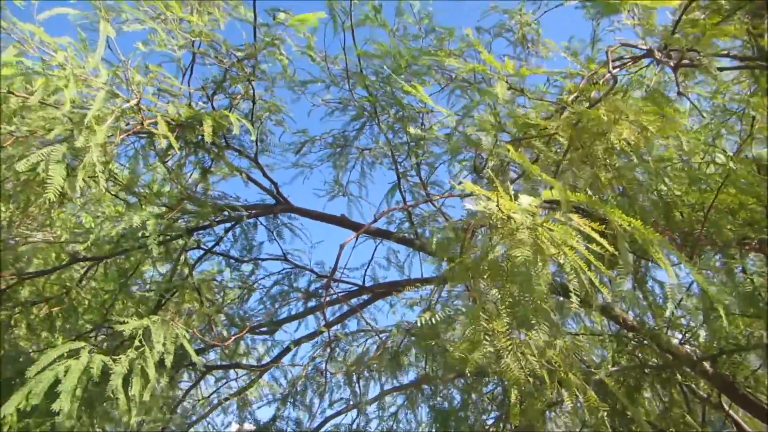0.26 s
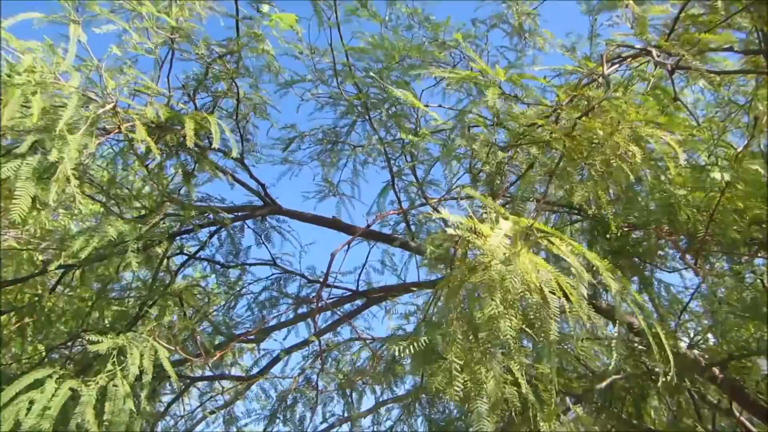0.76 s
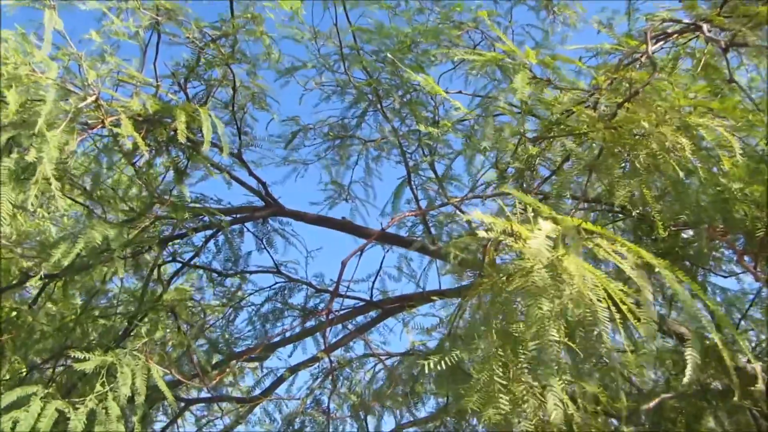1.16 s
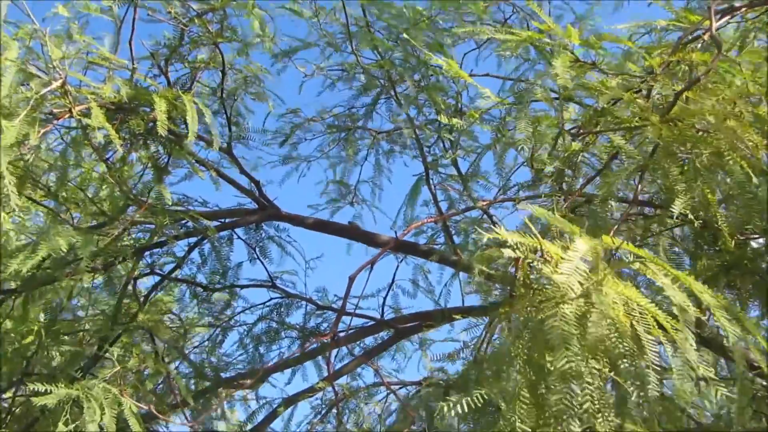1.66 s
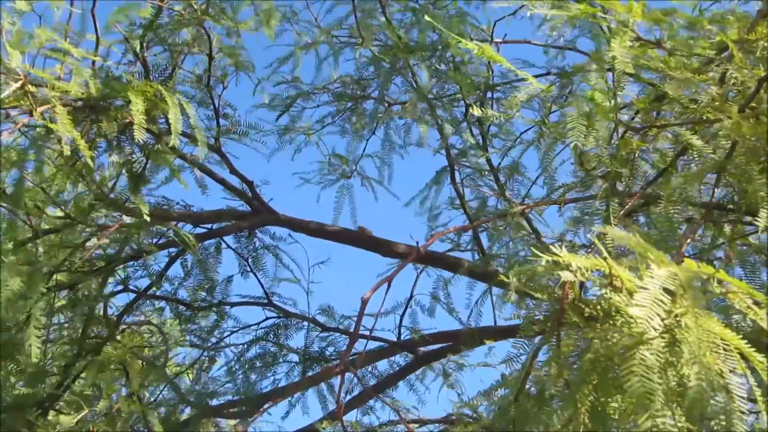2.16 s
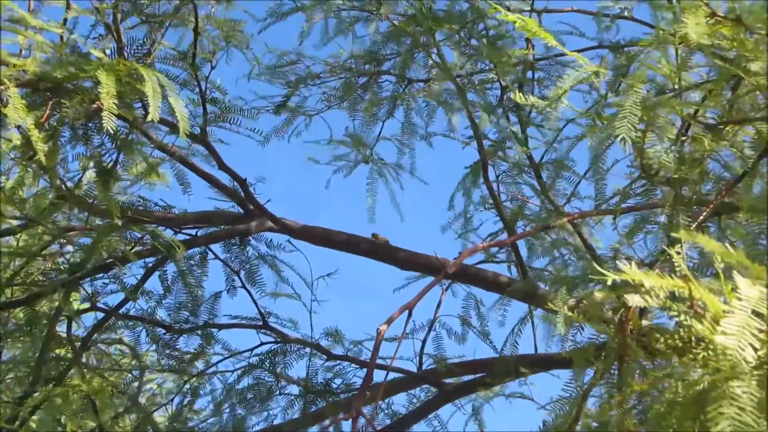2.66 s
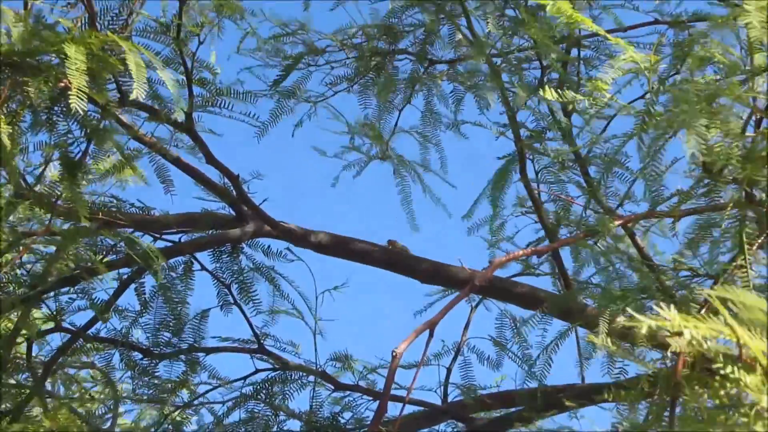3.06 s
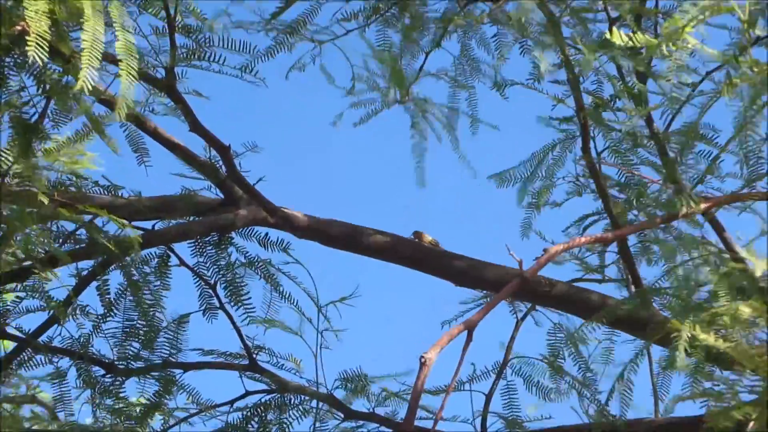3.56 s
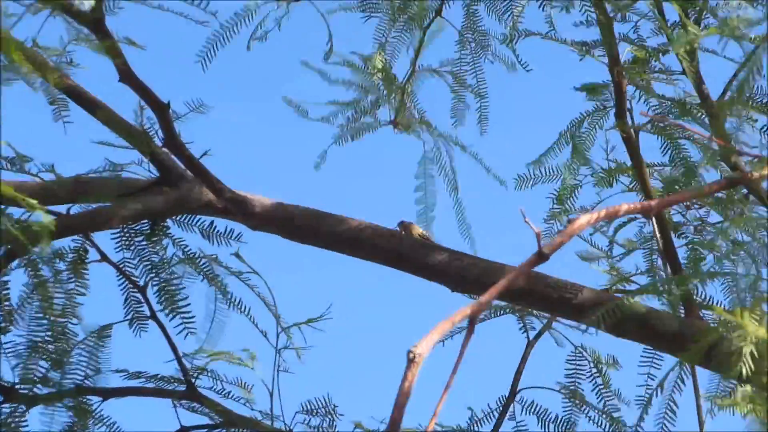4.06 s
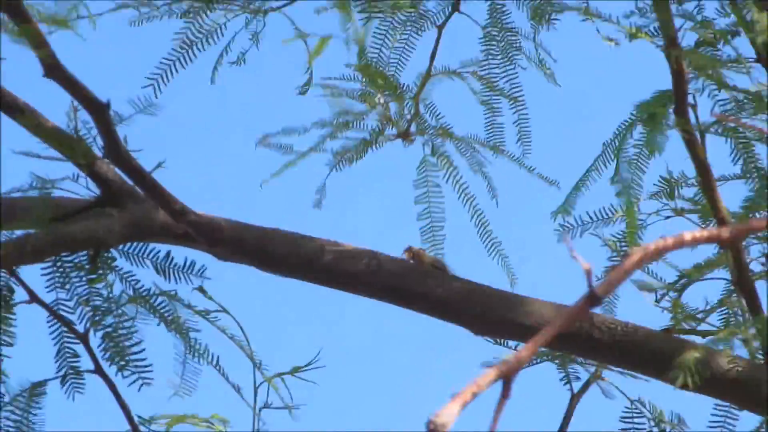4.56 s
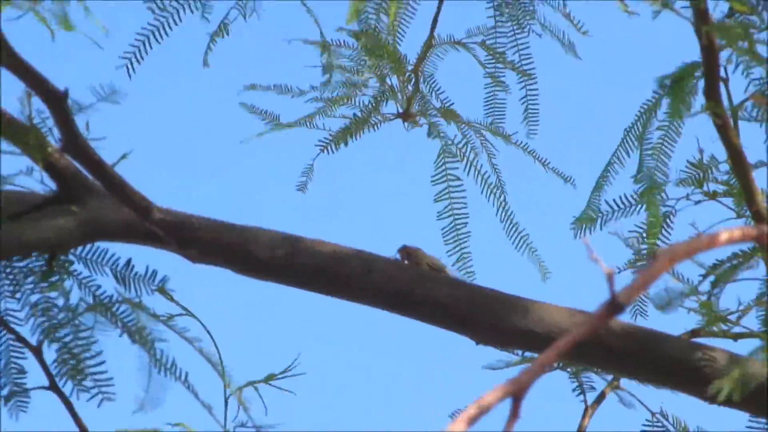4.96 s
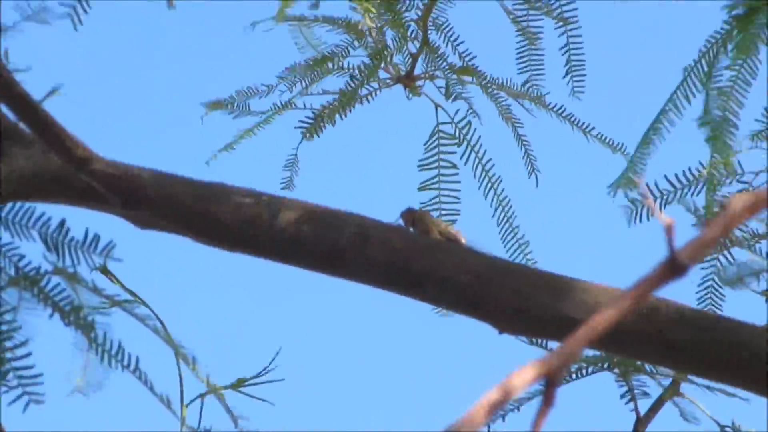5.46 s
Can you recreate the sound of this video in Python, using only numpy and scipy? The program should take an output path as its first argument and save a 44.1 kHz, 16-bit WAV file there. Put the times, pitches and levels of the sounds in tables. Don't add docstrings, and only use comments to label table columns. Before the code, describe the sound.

A cicada in a leafy tree holds a piercing, rattling high buzz over faint chorus, with zoom-lever clicks and soft wind thumps on the microphone.

```python
import sys
import numpy as np
from scipy import signal
from scipy.fft import rfft, irfft, next_fast_len
from scipy.io import wavfile
from scipy.ndimage import uniform_filter1d, minimum_filter1d, map_coordinates

SR = 44100
rng = np.random.default_rng(int(sys.argv[2]) if len(sys.argv) > 2 else 0)


def convert_level_to_amplitude(level_db):
    exponent = np.asarray(level_db, float) / 20
    return 10 ** exponent


def materialize(psi):
    bounded = np.clip(np.atleast_2d(psi).T, -1, 1)
    quanta = np.round(bounded * 32767).astype(np.int16)
    wavfile.write(sys.argv[1], SR, quanta)


N = 251370
TIME = np.arange(N) / SR


def unit(x):
    return x / np.sqrt(np.mean(x ** 2) + 1e-20)


def gain(points, hz):
    f, db = np.transpose(points)
    return convert_level_to_amplitude(np.interp(np.log(hz + 1), np.log(f + 1), db))


def wobble(rate_hz):
    return map_coordinates(rng.standard_normal(int(N * rate_hz / SR) + 4), [TIME * rate_hz])


def filtered(x, response):
    m = next_fast_len(N + 8192)
    return irfft(rfft(x, m) * response(np.fft.rfftfreq(m, 1 / SR)), m)[..., :N]


def resonance(f, hz, width_hz):
    return 1j * f * width_hz / (hz * hz - f * f + 1j * f * width_hz)


def passband(f, low_hz, high_hz, edge_hz):
    return np.clip(np.minimum(f - low_hz, high_hz - f) / edge_hz + .5, 0, 1)


def pulses(times_s, sizes):
    at = times_s.ravel()[:, None] * SR
    taps = np.floor(at) + np.arange(-15, 17)
    window = np.cos(np.pi * (taps - at) / 32) ** 2
    kernel = np.sinc(taps - at) * window * sizes.ravel()[:, None]
    return np.bincount(np.clip(taps, 0, N).astype(int).ravel(), kernel.ravel(), N + 1)[:N]


# delay_ms, sign, level_db, time_scatter_ms, size_scatter_db
RIBS = [(0, 1, 0, 0, .4), (.45, 1, -15, .004, 1.2), (.845, -1, -7.5, .006, 1), (1.035, -1, -20, .006, 1.5),
        (1.215, -1, -16, .008, 1.5), (1.42, 1, -14, .05, 1.2), (1.72, 1, -13.5, .06, 1.2),
        (2.8, 1, -19, .15, 2.5)]
RIB_PACE, RIB_SCATTER = .994, 0.45
# pitch_hz, level_db
SHORT_RIBS = [(6000, -7), (9000, -3), (11000, 2.5), (13000, -0.5), (15500, -17)]
# lead_ms, level_db
PAIR = (.2015, -3)
# pitch_hz, width_hz, level_db
AIR_SAC = (6470, 470, -13)


def singer(rate_hz, beat, colour, jitter_ms):
    even_s = np.arange(int(N / SR * rate_hz) + 1) / rate_hz
    lag_ms = np.interp(even_s, *np.transpose(beat)) + jitter_ms * rng.standard_normal(len(even_s))
    stroke_s = even_s + lag_ms / 1000
    delay_ms, sign, level_db, slip_ms, scatter_db = np.transpose(RIBS)
    time_chance, size_chance = rng.standard_normal((2, len(even_s), len(RIBS)))
    times_s = stroke_s[:, None] + (RIB_PACE * delay_ms + slip_ms * time_chance) / 1000
    sizes = sign * convert_level_to_amplitude(level_db + RIB_SCATTER * scatter_db * size_chance)
    first_rib = pulses(times_s[:, 0], sizes[:, 0])
    later_ribs = filtered(pulses(times_s[:, 1:], sizes[:, 1:]), lambda f: gain(SHORT_RIBS, f))
    lead_ms, pair_db = PAIR
    sac_hz, sac_width_hz, sac_db = AIR_SAC

    def body(f):
        both_tymbals = 1 + convert_level_to_amplitude(pair_db) * np.exp(2j * np.pi * f * lead_ms / 1000)
        sac = 1j * convert_level_to_amplitude(sac_db) * resonance(f, sac_hz, sac_width_hz) ** 2
        return both_tymbals * gain(colour, f) + sac

    return unit(filtered(first_rib + later_ribs, body))


# start_s, lag_ms
NEAR_BEAT = [(0, .38), (.3, .77), (.75, .74), (1.2, .42), (1.5, .5), (2.1, 1.08), (2.55, 1.2), (2.9, 1.46),
             (3.15, 1.28), (3.45, 1.39), (4.05, .62), (4.65, .76), (5.1, .42), (5.7, -.35)]
# pitch_hz, level_db
CLICK = [(2000, -45), (4300, -43), (5200, -30.5), (6000, -21), (7050, -9), (7500, 2.5), (8500, -0.5),
         (10000, 0), (11200, -2), (12400, 3.5), (13900, -4), (14600, -14.5), (15300, -15.5), (15900, -38)]
# start_s, level_db
SONG = [(0, -23.5), (.6, -24), (1.6, -23), (2.56, -22), (3.5, -23), (4.6, -23.5), (5.3, -23), (5.7, -23)]


def near_cicada():
    effort_db = np.interp(TIME, *np.transpose(SONG))
    return convert_level_to_amplitude(effort_db + 0.3 * wobble(11)) * singer(160.5, NEAR_BEAT, CLICK, jitter_ms=.057)


# start_s, lag_ms
FAR_BEAT = [(0, 1.2), (1, .6), (2, .8), (3, 0), (4, -.6), (4.5, -.9), (5.7, -.3)]
# pitch_hz, level_db
NEIGHBOUR = [(3000, -67), (5500, -37), (7000, 0), (9000, 3.5), (10500, -6), (12400, -4), (13700, -3),
             (16000, -55)]
NEIGHBOUR_DB, NEIGHBOUR_FADE_DB_PER_S = -35, -0.3


def neighbour():
    level_db = NEIGHBOUR_DB + NEIGHBOUR_FADE_DB_PER_S * TIME + 0.59 * wobble(3.75)
    return convert_level_to_amplitude(level_db) * singer(154, FAR_BEAT, NEIGHBOUR, jitter_ms=.06)


# pitch_hz, level_db
CHORUS = [(3000, -68), (5000, -28), (5900, -20.5), (6600, -11), (7300, -5), (8800, 1), (9600, -1),
          (11000, -4.5), (12500, -10), (14000, -11), (15400, -16), (16000, -30)]
CHORUS_DB = -34


def chorus():
    blur = filtered(rng.standard_normal(N) * convert_level_to_amplitude(0.2 * wobble(300)), lambda f: gain(CHORUS, f))
    return convert_level_to_amplitude(CHORUS_DB + 0.62 * wobble(2.83)) * unit(blur)


# pitch_hz, density_db_per_hz
AIR = [(12, -26), (30, -3), (70, -2), (120, 0.5), (300, -9.5), (600, -12.5), (1100, -14.5), (1900, -22.5),
       (2450, -19.5), (3100, -23.5), (3850, -20.5), (4350, -26.5), (7000, -17), (9000, -55)]
# centre_s, rise_db, half_length_s
GUSTS = [
    (0.173, 4.5, 0.19),
    (.97, 4, 0.03),
    (3.66, 2.5, 0.055),
    (3.882, 10, 0.045),
    (4.105, 7, 0.08),
    (4.38, 5.5, 0.031),
    (4.502, 5.5, 0.044),
    (4.893, 3.5, 0.056),
]
RUMBLE_DB, RUSTLE_DB = -56, -57.5
RUSTLE_FOLLOWS = 0.1


def air():
    gust_db = sum(db * np.exp(-((TIME - s) / half_s) ** 2) for s, db, half_s in GUSTS)
    low = lambda f: 1 / (1 + (f / 300) ** 4)
    rumble = rng.standard_normal(N) * convert_level_to_amplitude(0.96 * wobble(14))
    rumble = filtered(rumble, lambda f: gain(AIR, f) * np.sqrt(low(f)))
    rustle = rng.standard_normal(N) * convert_level_to_amplitude(1.13 * wobble(19) + 0.68 * wobble(150))
    rustle = filtered(rustle, lambda f: gain(AIR, f) * np.sqrt(1 - low(f)))
    shared_db = 0.2 * wobble(12)
    rumble = convert_level_to_amplitude(RUMBLE_DB + gust_db + 1.17 * wobble(5.23)) * unit(rumble)
    rustle = convert_level_to_amplitude(RUSTLE_DB + RUSTLE_FOLLOWS * gust_db) * unit(rustle)
    return convert_level_to_amplitude(shared_db) * (rumble + rustle)


# pitch_hz, width_hz, level_db
HUM = [(658, 47, -79), (1089, 6.7, -75.5)]


def hum():
    out = np.zeros(N)
    for hz, width_hz, db in HUM:
        out += convert_level_to_amplitude(db) * unit(filtered(rng.standard_normal(N), lambda f: resonance(f, hz, width_hz)))
    return out


# centre_s, peak_db, pitch_hz
BUMPS = [(0.543, -40, 195), (0.542, -43, 900), (4.647, -40, 650), (3.669, -40.5, 98.5), (3.753, -40, 89),
         (3.818, -34.5, 76), (3.851, -29, 79), (3.872, -27, 70), (3.9, -38, 92), (4.049, -38, 80),
         (4.087, -34, 115), (4.098, -34, 111), (4.131, -37, 130), (4.1635, -27, 223), (4.344, -41, 55.5),
         (4.518, -39, 80), (4.73, -41.5, 65), (4.918, -39.5, 110)]


def bumps():
    out = np.zeros(N)
    for s, db, hz in BUMPS:
        cycles = (TIME - s) * hz
        out -= convert_level_to_amplitude(db) * np.exp(-(cycles / 0.53) ** 2) * np.cos(2 * np.pi * cycles)
    return out


# start_s, middle_mode_db, middle_mode_hz, low_mode_db
LEVER = [
    (0.542, -51, 2540, -58),
    (0.633, -43, 2750, -49),
    (0.6903, -50, 2270, -61),
    (4.637, -44, 2300, -52),
    (4.6952, -51, 2760, -49),
    (4.776, -37.5, 2380, -43),
]
# start_s, middle_mode_db, middle_mode_hz, low_mode_db
CREAK = [
    (4.7107, -54, 2290, -52),
    (4.717, -40, 2280, -40),
    (4.7219, -34, 2340, -38),
    (4.7278, -39, 2430, -34.5),
]
# low_mode_hz, high_over_middle_ratio, ring_s
SHELL = (1520, 1.5, 0.00087)
LEVER_HIGH_DB, CREAK_HIGH_DB = -7, -24


def zoom_lever():
    out, t = np.zeros(N), np.arange(500) / SR
    low_hz, ratio, ring_s = SHELL
    swell = t / ring_s * np.exp(1 - t / ring_s)
    for rows, high_db in [(LEVER, LEVER_HIGH_DB), (CREAK, CREAK_HIGH_DB)]:
        for s, middle_db, middle_hz, low_db in rows:
            modes = [(low_hz, low_db - 0.5), (middle_hz, middle_db - .6),
                     (ratio * middle_hz, middle_db + high_db)]
            ring = sum(convert_level_to_amplitude(db) * np.sin(2 * np.pi * hz * t) for hz, db in modes)
            out[round(s * SR):][:len(t)] += swell * ring
    return out


# start_s, end_s
ZOOM = (.6056, 4.6368)
LIFT_DB, LIFT_RISE_S, LIFT_FALL_S = 2.1, .8, .18


def lift():
    rise = 1 - np.exp(-np.clip(TIME - ZOOM[0], 0, None) / LIFT_RISE_S)
    return convert_level_to_amplitude(LIFT_DB * rise * np.exp(-np.clip(TIME - ZOOM[1], 0, None) / LIFT_FALL_S))


# pitch_hz, level_db
DULLING = [(2500, 0.5), (4400, -6.5), (5300, -12.5), (6500, -11), (8000, -6.5), (9500, -4), (11500, -2)]
# start_db, end_db
TICKS_DB = (-19, -33)


def zoom_dulling(x):
    zooming = (TIME > ZOOM[0]) & (TIME < ZOOM[1])
    x = lift() * np.where(zooming, filtered(x, lambda f: gain(DULLING, f)), x)
    x[0, np.round(np.multiply(ZOOM, SR)).astype(int)] += convert_level_to_amplitude(np.array(TICKS_DB))
    return x


def limited(x):
    ceiling = .47
    need = np.minimum(1, ceiling / (np.abs(x) + 1e-9)) ** .7
    need = minimum_filter1d(need, size=120)
    return x * uniform_filter1d(uniform_filter1d(need, size=60), size=60)


# low_hz, high_hz
RAGGED = [(11620, 11900), (11900, 12250)]
FLECK_DB, FLECKS_PER_S = -5, 110


def flecked(x):
    out = x
    for low_hz, high_hz in RAGGED:
        band = filtered(x, lambda f: passband(f, low_hz, high_hz, 100))
        out = out + (unit(convert_level_to_amplitude(FLECK_DB * wobble(FLECKS_PER_S) ** 2)) - 1) * band
    return out


STARVED = [.801, 1.037, 1.08, 1.441, 1.506, 1.676, 2.506, 2.955, 3.532, 3.874, 4.47, 4.811, 5.259]
STARVE_MS, STARVE_DB = 11, -16.5
# centre_s, length_ms, depth_db
EMPTIED = (3.160, 18, -45)
# low_hz, high_hz, share_lost
STARVED_BANDS = [(-200, 278, .8), (278, 7200, 0.99), (7700, 8300, 0.4), (8750, 11600, 0.052),
                 (11700, 12600, .85), (14500, 14950, 0.95)]


def starved(x):
    kept = np.ones(N)
    for s, ms, db in [(s, STARVE_MS, STARVE_DB) for s in STARVED] + [EMPTIED]:
        kept *= convert_level_to_amplitude(db * np.exp(-((TIME - s) * 1500 / ms) ** 4))
    lost = lambda f: sum(share * passband(f, lo, hi, 200) for lo, hi, share in STARVED_BANDS)
    knots_hz, turns = np.linspace(0, SR / 2, 400), 2 * np.pi * rng.random(400)

    def smear(f):
        remaining = (f > 7200) * (1 - lost(f)).clip(0, 1)
        return remaining * np.exp(1j * np.interp(f, knots_hz, turns))

    return x - (1 - kept) * (filtered(x, lost) - 0.82 * filtered(x, smear))


def scene():
    cicadas = near_cicada() + neighbour() + chorus()
    handling = (bumps() + zoom_lever()) / lift()
    return (cicadas + air() + hum() + handling)[None]


def roll_off(x):
    return signal.sosfilt(signal.butter(12, 15835, fs=SR, output="sos"), x)


# pitch_hz, width_hz, depth_0_to_1
PORT = (12400, 260, .92)
LOW_CUT_HZ = 36


def record(dry):
    hz, width_hz, depth = PORT
    low_cut = lambda f: 1j * f / (LOW_CUT_HZ + 1j * f)
    x = filtered(dry, lambda f: (1 - depth * resonance(f, hz, width_hz)) * low_cut(f))
    x = limited(zoom_dulling(x))
    x = starved(flecked(x))
    return roll_off(x)


dry = scene()
out = record(dry)
materialize(out)
```